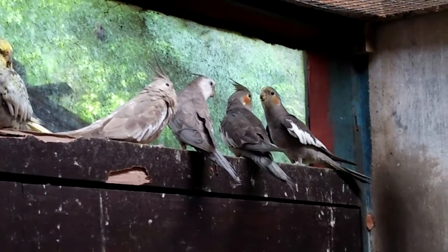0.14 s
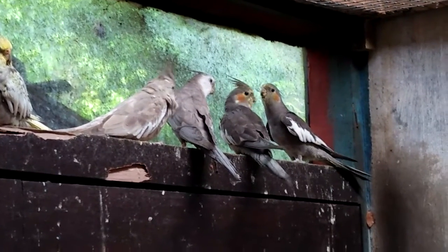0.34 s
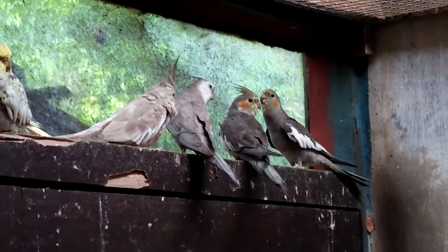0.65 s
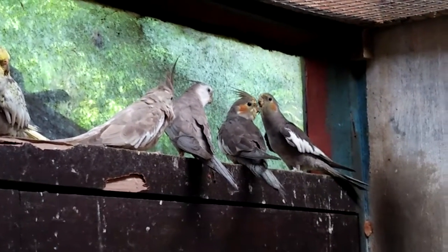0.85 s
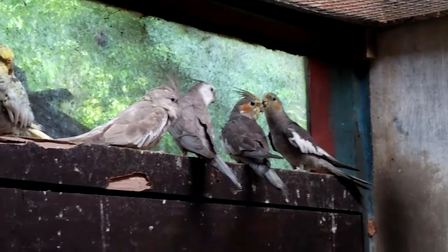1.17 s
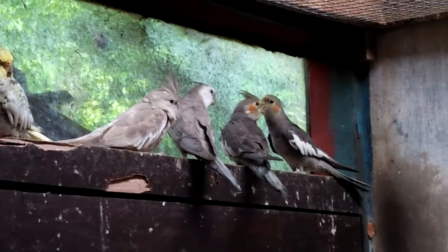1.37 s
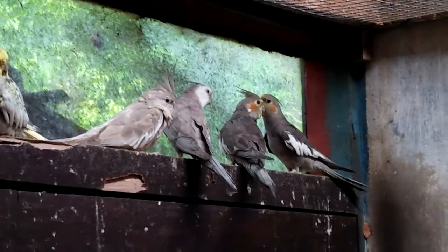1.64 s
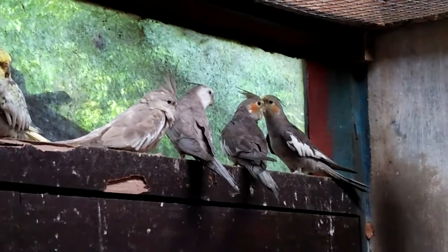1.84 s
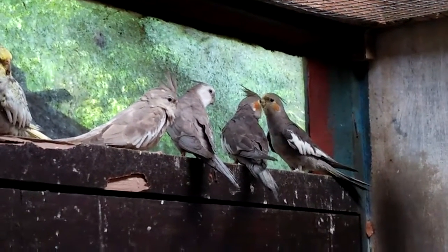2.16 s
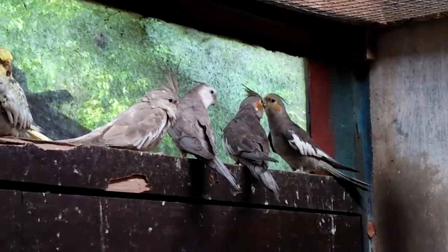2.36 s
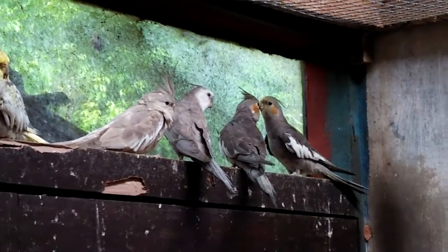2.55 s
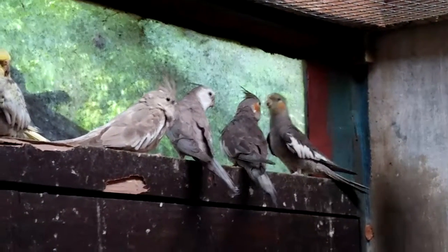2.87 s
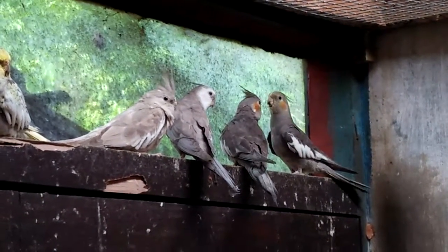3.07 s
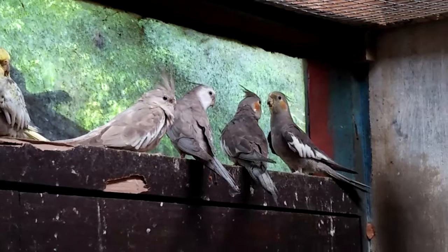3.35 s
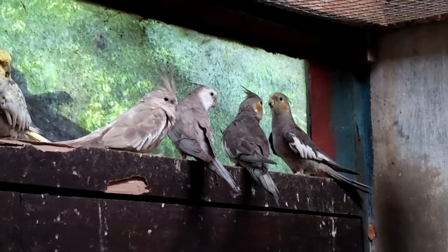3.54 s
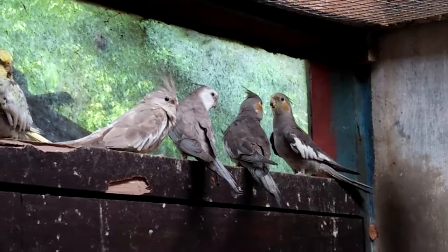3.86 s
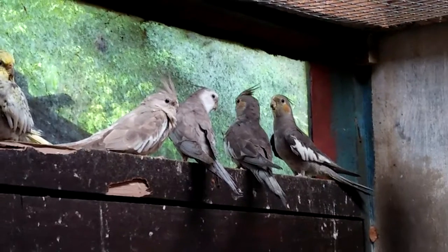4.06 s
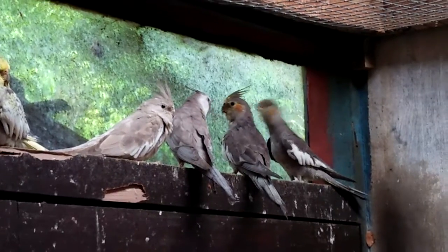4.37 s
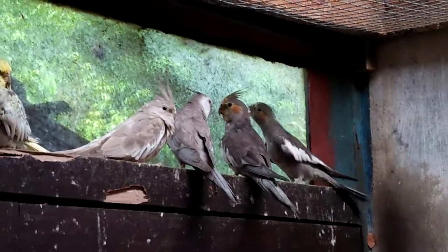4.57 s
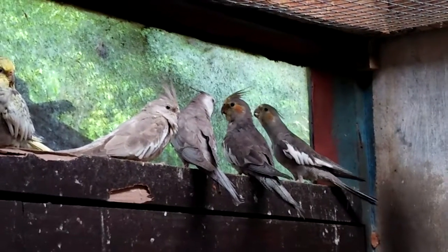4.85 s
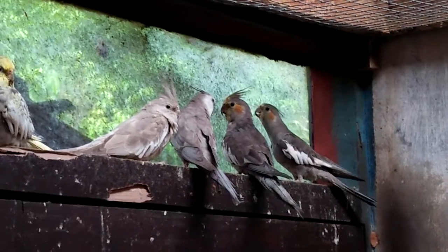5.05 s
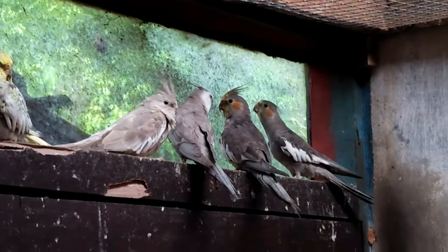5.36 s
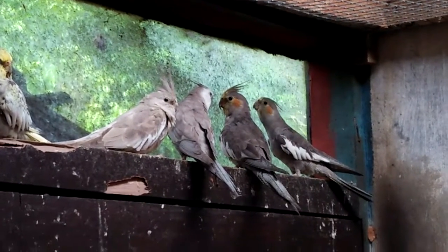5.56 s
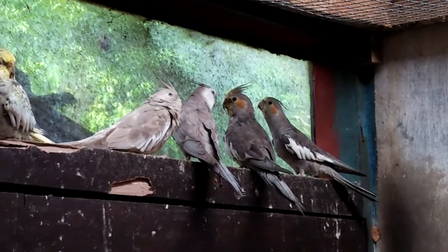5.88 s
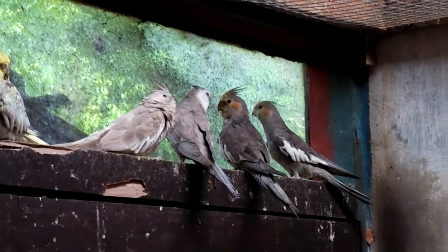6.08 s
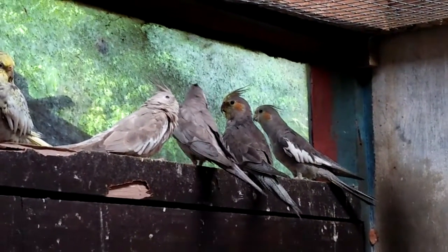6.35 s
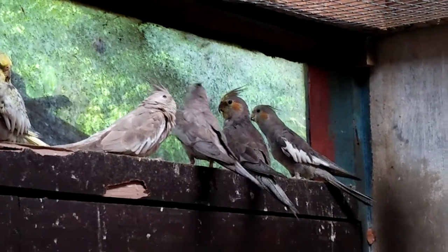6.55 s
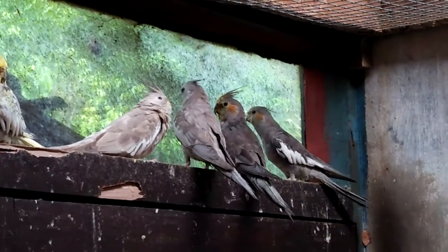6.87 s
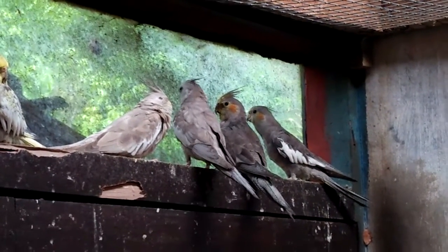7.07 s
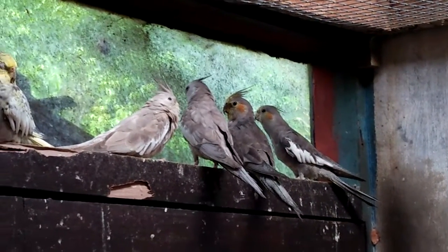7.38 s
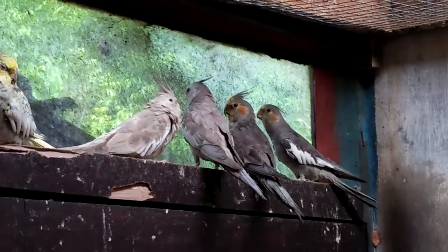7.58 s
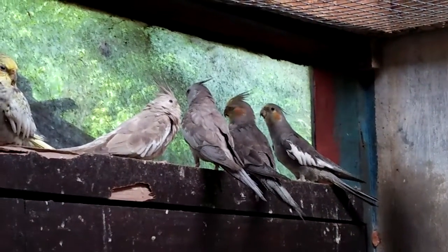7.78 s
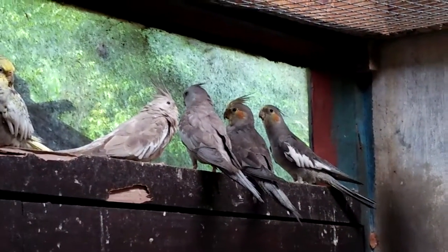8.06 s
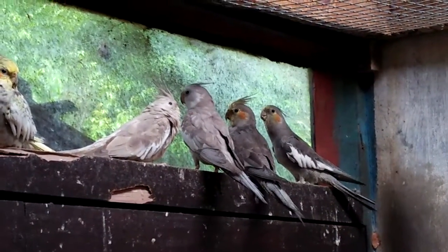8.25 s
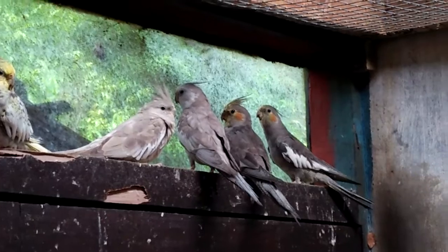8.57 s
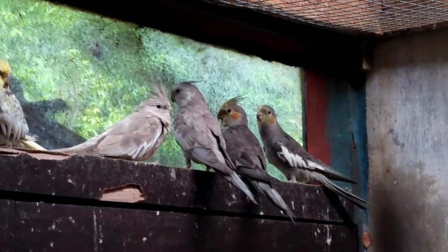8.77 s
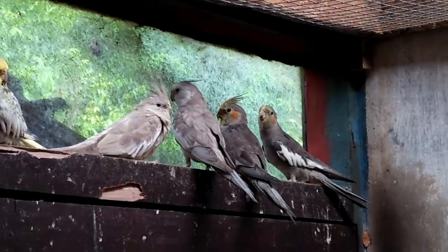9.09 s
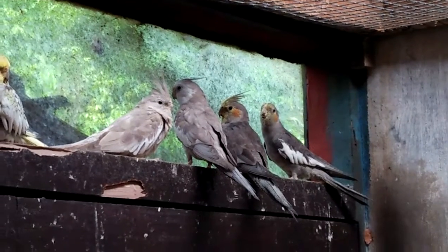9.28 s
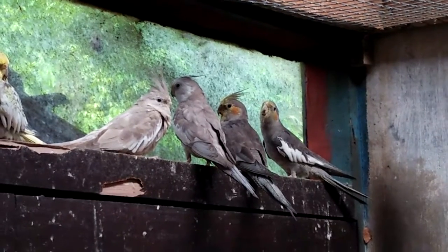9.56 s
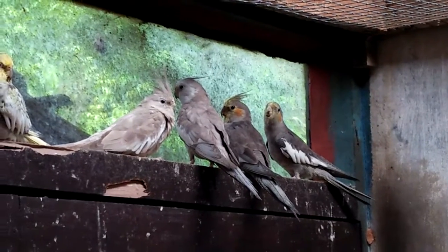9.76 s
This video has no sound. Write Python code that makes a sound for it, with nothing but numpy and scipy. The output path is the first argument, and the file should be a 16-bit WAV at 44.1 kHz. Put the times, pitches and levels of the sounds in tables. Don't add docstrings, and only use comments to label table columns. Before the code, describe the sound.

Several cockatiels call close to the microphone in a small wooden aviary. Quick chirps and a tumbling whistle open, then rasps, harsh squawks and slow falling whistles. A busy burst of sharp peeps and honks follows mid-way. Later one near bird repeats a loud dip-and-rise whistle that cracks, over soft thumps on planks. A yard fowl yelps faintly three times; distant traffic rumbles.

```python
import sys
import numpy as np
from scipy import signal
from scipy.fft import rfft, irfft
from scipy.io import wavfile
from scipy.ndimage import uniform_filter1d

SR = 44100
rng = np.random.default_rng(int(sys.argv[2]) if len(sys.argv) > 2 else 0)


def invert_db(x):
    u = np.asarray(x, float) / 20
    return 10 ** u


def materialize(psi):
    bounded = np.clip(np.atleast_2d(psi).T, -1, 1)
    quanta = np.round(bounded * 32767).astype(np.int16)
    wavfile.write(sys.argv[1], SR, quanta)


N = 437472


def unit(x):
    return x / np.sqrt(np.mean(x ** 2))


def band(x, lo_hz, hi_hz):
    return signal.sosfilt(signal.butter(2, [lo_hz, hi_hz], "band", fs=SR, output="sos"), x)


def colour(x, spectrum):
    hz, db = np.transpose(spectrum)
    bins = np.fft.rfftfreq(len(x), 1 / SR) + 1
    gain = invert_db(np.interp(np.log(bins), np.log(hz), db))
    return irfft(rfft(x) * gain, len(x))


def wobble(n, rate_hz):
    k = max(int(SR / rate_hz), 2)
    smooth = uniform_filter1d(uniform_filter1d(rng.standard_normal(n), k), k)
    return smooth * np.sqrt(1.5 * k)


def follow(rows, fade_s=.007):
    s, *columns = np.transpose(rows)
    start = int(s[0] * SR)
    t = np.arange(start, int(s[-1] * SR)) / SR
    fade = np.clip(np.minimum(t - s[0], s[-1] - t) / fade_s, 0, 1) ** 2
    return start, fade, [np.interp(t, s, c) for c in columns]


def add(track, start, x):
    x = x[:len(track) - start]
    track[start:start + len(x)] += x


def swell(s, length, db, peak_at, start_db, end_db):
    share = np.linspace(0, 1, num=15)
    shape_db = np.interp(share, [0, np.clip(peak_at, .02, .98), 1], [start_db, 0, end_db])
    return np.c_[s + length * share, db + shape_db]


def notes(table, peak_at, start_db, end_db, hold_before, hold_after, arch=0):
    share = np.linspace(0, 1, num=15)
    done, left = share ** hold_before, (1 - share) ** hold_after
    glide = done / (done + left)
    lift = 1 + arch * np.sin(np.pi * share)
    calls = []
    for s, length, from_hz, to_hz, db in table:
        pitch = lift * from_hz * (to_hz / from_hz) ** glide
        levels = swell(s, length, db, peak_at, start_db, end_db)
        calls.append(np.insert(levels, 1, pitch, axis=1))
    return calls


def partials(hz, levels_db):
    turn = 2 * np.pi * np.cumsum(hz) / SR
    total = 0
    for number, db in enumerate(levels_db, start=1):
        total = total + invert_db(db) * (number * hz < .4 * SR) * np.sin(number * turn)
    return total * np.sqrt(2)


# (frequency [Hz], level [dB per Hz])
YARD = [(15, -66), (25, -19), (60, -13.5), (135, -1.5), (210, -12), (370, -29.5), (460, -29.5), (2500, -24),
        (4000, -46.5), (14000, -38.5)]
# (time [s], level [dB])
RUMBLE = [(0, -70), (.9, -72.5), (1.3, -76.5), (1.7, -73.5), (2.1, -67), (2.6, -73), (2.95, -78.5),
          (3.7, -68), (4.2, -75), (4.85, -66), (5.15, -75), (5.6, -65), (6.05, -71), (6.8, -73), (7.7, -70),
          (8.65, -74), (9.2, -73.5), (9.92, -74)]
# (time [s], level [dB])
FAR_PENS = [(0, -60.5), (.55, -74), (.85, -67.5), (2.052, -66.5), (2.298, -70), (4.398, -64.5), (5.1, -71),
            (5.8, -62.5), (6.1, -78.5), (7.5, -64), (8.65, -69), (9.92, -65.5)]


def yard():
    t = np.arange(N) / SR
    rumble_top_hz = 260
    air = invert_db(-67.5) * unit(colour(rng.standard_normal(N), YARD))
    murmur = invert_db(5 * wobble(N, 8)) * unit(band(rng.standard_normal(N), 420, 1800))
    high_pass = signal.butter(4, rumble_top_hz, "high", fs=SR, output="sos")
    hiss = signal.sosfilt(high_pass, air) * invert_db(2.5 * wobble(N, 4))
    rumble_db = np.interp(t, *np.transpose(RUMBLE)) + 1.5 * wobble(N, 8)
    rumble = invert_db(rumble_db) * unit(band(air, 12, rumble_top_hz))
    return hiss + rumble + invert_db(np.interp(t, *np.transpose(FAR_PENS))) * murmur


def shelter(x, direct_db):
    t60_s, treble_t60_s, tail_db, echo_db = 0.32, 0.22, -1.5, -13
    t = np.arange(int(.7 * SR)) / SR
    noise = rng.standard_normal(len(t))
    low = signal.sosfilt(signal.butter(1, 4000, fs=SR, output="sos"), noise)
    tail = low * 1000 ** (-t / t60_s) + (noise - low) * 1000 ** (-t / treble_t60_s)
    tail = tail * (1 - np.exp(-t / 0.022))
    response = invert_db(tail_db) * tail / np.sqrt(np.sum(tail ** 2))
    response[rng.integers(100, 1000, size=16)] += invert_db(echo_db) * rng.standard_normal(16)
    response[0] = invert_db(direct_db)
    return signal.fftconvolve(x, response)[:N] / np.sqrt(np.sum(response ** 2))


# (time from its start [s], pitch [Hz], level [dB])
YELP = [(0, 631.7, 6), (.03, 533, 5), (.06, 453.5, 5), (.12, 389.7, 0.5), (.2, 340, -5), (.34, 270, -11)]
YELP_PARTIALS_DB = [-6, -1, 0, -3, -9, -19]
# (time [s], level [dB])
YELPS = [
    (2.228, -55),
    (5.315, -50.5),
    (8.165, -53),
]


def fowl():
    out = np.zeros(N)
    for s, db in YELPS:
        _, fade, (hz, shape_db) = follow(YELP, fade_s=.012)
        hz = hz * (1 + .045 * wobble(len(hz), 200))
        shape_db = shape_db + 3.5 * wobble(len(hz), 40)
        add(out, int(s * SR), fade * invert_db(db + shape_db) * partials(hz, YELP_PARTIALS_DB))
    return out


# (time [s], peak level [dB], share of the deepest ring [dB])
THUMPS = [(6.312, -48, 0.5), (6.639, -40, -3.5), (6.777, -41, -17), (7.049, -63, 14), (7.21, -48, 10),
          (7.464, -41, 1.5), (7.767, -37.5, 0), (8.524, -51, 6), (8.911, -38.5, 6.5), (8.999, -38, 0.5),
          (9.248, -43, 7), (9.479, -50.5, -3), (9.642, -40.5, 3), (9.684, -37.5, 5.5)]
# (frequency [Hz], level [dB], time to fade by 60 dB [s])
PLANKS = [(180.7, -9, 0.14), (291.3, -10, 0.23), (461, 0.5, 0.13), (600, -3, 0.071), (813, -14.5, 0.13),
          (1000, -37.5, 0.076)]


def thumps():
    out, t = np.zeros(N), np.arange(SR // 3) / SR
    detune = .06
    for s, db, deep_db in THUMPS:
        chance = rng.standard_normal((len(PLANKS), 2))
        ring = 0
        for k, ((hz, mode_db, t60_s), (level_luck, pitch_luck)) in enumerate(zip(PLANKS, chance)):
            gain = invert_db(mode_db + 3.0 * level_luck + (deep_db if k == 0 else 0))
            tone = np.sin(2 * np.pi * hz * (1 + detune * pitch_luck) * t)
            ring = ring + gain * tone * 1000 ** (-t / t60_s)
        boom = unit(band(rng.standard_normal(len(t)), 152, 224)) * 1000 ** (-t / 0.18)
        scrape = unit(band(rng.standard_normal(len(t)), 150, 2000)) * 1000 ** (-t / 0.24)
        blow = ring + invert_db(-2.0) * scrape + invert_db(-6.5 + deep_db) * boom
        add(out, int(s * SR), invert_db(db - 2.5) * blow * (1 - np.exp(-t / 0.0025)))
    return band(out, 125, 6000)


# (time [s], length [s], peak level [dB])
RUSTLE = [
    (3.371, 0.97, -62),
    (6.282, 0.06, -56.5),
    (7.939, 0.18, -64.5),
]


def rustle():
    out = np.zeros(N)
    for rows in RUSTLE:
        start, fade, (db,) = follow(swell(*rows, peak_at=0.4, start_db=-5.5, end_db=-12.5))
        grains = invert_db(2.4 * wobble(len(db), 200)) * rng.standard_normal(len(db))
        add(out, start, fade * invert_db(db) * unit(band(grains, 3100, 9700)))
    return out


def whistles(calls, rough, second_db, third_db, tense_db=11, throb=0):
    out = np.zeros(N)
    clear = np.clip(1.5 - 2.4 * rough, 0, 1)
    for rows in calls:
        start, fade, (hz, db) = follow(rows, fade_s=.008 + .012 * rough)
        hz, n = uniform_filter1d(hz, 200), len(hz)
        falling = np.clip(-np.gradient(np.log2(hz)) * SR, 0, 30)
        shake = np.clip(rough, 0, .75)
        shake = shake + .016 * falling * np.clip(1 - 1.4 * shake, 0, 1)
        hz = hz * (1 + 0.00993 * wobble(n, 120) + 0.16 * shake ** 2 * wobble(n, 866))
        windpipe_db = 23 * clear * np.exp(-(np.log2(2 * hz / 3750) / 0.29) ** 2)
        effort_db = .65 * (db - np.max(db))
        edge_db = third_db + effort_db + tense_db * np.log2(hz / np.mean(hz)) + 4 * wobble(n, 25)
        levels_db = [0, second_db + effort_db + windpipe_db - np.mean(windpipe_db)]
        levels_db += [edge_db + (-1.5 - 7 * shake) * k for k in range(6)]
        flutter = invert_db(1.96 * wobble(n, 41) + 7.0 * shake * wobble(n, 300))
        throb_hz = 76 * (1 + .25 * wobble(n, 30))
        beat = np.cos(2 * np.pi * np.cumsum(throb_hz) / SR)
        flutter = flutter * (1 + throb * invert_db(effort_db) * beat)
        air = invert_db(-55 + effort_db + 32 * shake) * band(rng.standard_normal(n), 1500, 14000)
        add(out, start, fade * invert_db(db) * flutter * (partials(hz, levels_db) + air))
    return out


# (time from its start [s], pitch [Hz], level [dB])
THIN = [(0, 5150, -23), (.055, 3952, -11), (.23, 3835, -6.5), (.28, 3404, -5), (0.301, 2260, -4)]
# (time [s], pitch ratio, level [dB])
THINS = [
    (.03, 1.04, -45.5),
    (6.05, .985, -43),
]


def thin_whistles():
    calls = [np.array(THIN) * (1, ratio, 1) + (s, 0, db) for s, ratio, db in THINS]
    return whistles(calls, rough=.1, second_db=-18, third_db=-41)


# (time [s], length [s], from [Hz], to [Hz], peak level [dB])
SIGHS = [(.71, .13, 2498, 2574, -31), (.25, 0.13, 2670, 2100, -41.5), (.29, 0.086, 1930, 1400, -38),
         (.71, 0.098, 1880, 1492, -40), (1.75, .17, 2008, 1570, -41), (1.86, 0.055, 2630, 2400, -52.5),
         (2.27, 0.16, 3900, 3240, -57), (2.27, .13, 2950, 2470, -42.5), (2.78, 0.089, 2072, 1522, -38.5),
         (2.84, 0.14, 2640, 2156, -44.5), (3.82, 0.058, 2560, 2100, -38.5), (3.96, 0.11, 3940, 2950, -55.5),
         (4.6, 0.15, 2114, 1910, -44), (6.12, .18, 1848, 1471, -39.5), (7.97, 0.15, 1878, 1494, -36),
         (8.69, 0.062, 1894, 1850, -54.5), (9.16, 0.17, 2006, 1547, -41), (9.69, .21, 1865, 1507, -41.5),
         (9.89, 0.053, 2200, 2390, -41)]


def sighs():
    calls = notes(SIGHS, peak_at=0.74, start_db=-12.5, end_db=-4, hold_before=1.96, hold_after=1.4)
    return whistles(calls, rough=.27, second_db=-38.5, third_db=-41.5)


# (time [s], length [s], from [Hz], to [Hz], peak level [dB])
CHEEPS = [(4.312, 0.034, 2760, 2050, -34), (.2, 0.074, 769, 737, -58.5), (.8, .06, 820, 697, -53.5),
          (.96, .04, 950, 874, -52.5), (8.02, 0.049, 1156, 1000, -47.5), (0, 0.029, 2326, 1562, -32),
          (.03, 0.079, 1792, 1716, -29.5), (2.17, 0.056, 1717, 1465, -38.5), (2.47, 0.083, 1837, 1510, -40),
          (2.92, 0.075, 1690, 1790, -31.5), (3.27, .15, 1917, 1795, -42), (3.85, 0.044, 1550, 1760, -32.5),
          (4.297, 0.023, 2960, 2960, -37), (4.97, 0.065, 1645, 1494, -37.5), (5.47, 0.068, 2030, 1794, -42),
          (5.74, 0.042, 1570, 1446, -43), (5.92, 0.024, 1230, 1058, -46), (5.93, 0.095, 2556, 2290, -61),
          (6.04, 0.068, 2030, 2060, -72), (7.1, 0.12, 1786, 1546, -37.5), (7.61, 0.067, 1232, 1149, -35),
          (8.58, 0.14, 2260, 2260, -64), (8.7, 0.049, 3760, 3750, -71), (9.68, .06, 2650, 2550, -57),
          (9.85, 0.057, 3650, 3350, -57), (4.335, 0.068, 2660, 2350, -44), (9.3, 0.058, 1315, 1250, -43),
          (9.49, 0.019, 1232, 1150, -40), (9.52, 0.1, 3790, 3520, -57.5)]


def cheeps():
    calls = notes(CHEEPS, peak_at=0.16, start_db=2, end_db=-13.5, hold_before=1.16, hold_after=1)
    return whistles(calls, rough=.37, second_db=-39, third_db=-40)


# (time [s], length [s], from [Hz], to [Hz], peak level [dB])
CROAKS = [(6.452, .06, 1200, 905, -52.5), (9.17, 0.068, 1900, 1650, -47.5), (8.755, 0.101, 1570, 1540, -43),
          (4.15, 0.04, 1705, 1430, -44.5), (4.57, 0.17, 1554, 1490, -52.5),
          (5.37, 0.051, 1680, 1370, -40.5), (8.04, 0.049, 910, 945, -45.5),
          (9.025, 0.069, 1350, 1215, -48.5), (2.585, .061, 2400, 2100, -49.5),
          (8.74, .031, 1100, 1490, -56)]


def rough_glides(table):
    return notes(table, peak_at=3.65, start_db=-3, end_db=-16, hold_before=1, hold_after=1.7)


def croaks():
    return whistles(rough_glides(CROAKS), rough=.62, second_db=-5.5, third_db=-21.5)


# (time [s], length [s], from [Hz], to [Hz], peak level [dB])
HONKS = [
    (4.085, 0.062, 1205, 1200, -49),
    (4.13, 0.074, 2060, 2020, -42),
    (4.328, 0.15, 2038, 1982, -41.5),
    (5.23, 0.04, 2050, 2180, -30.5),
]


def honks():
    calls = notes(HONKS, peak_at=0.7, start_db=4, end_db=-22, hold_before=0.04, hold_after=1.2)
    return whistles(calls, rough=.4, second_db=-8.5, third_db=-30)


# (time [s], length [s], from [Hz], to [Hz], peak level [dB])
MUTTERS = [
    (9.125, 0.11, 1150, 1602, -41),
    (9.27, .11, 1400, 1288, -43),
    (9.48, 0.05, 1217, 1210, -54.5),
    (9.59, 0.069, 1185, 1400, -42.5),
]


def mutters():
    calls = notes(MUTTERS, peak_at=.5, start_db=-6.5, end_db=-19, hold_before=1.16, hold_after=1.23, arch=.12)
    return whistles(calls, rough=.68, second_db=-6, third_db=-20)


# (time [s], length [s], from [Hz], to [Hz], peak level [dB])
STROKES = [
    (4.932, 0.029, 2820, 1950, -42.5),
    (5.078, 0.03, 3250, 1548, -31.5),
    (5.256, 0.0302, 2187, 1460, -29),
]


def strokes():
    return whistles(rough_glides(STROKES), rough=.7, second_db=-3.5, third_db=-21.5)


# (time [s], length [s], from [Hz], to [Hz], peak level [dB])
BLEATS = [
    (4.432, 0.039, 1645, 1650, -36),
    (4.463, .046, 1560, 1510, -38.5),
    (5.345, .076, 1910, 1690, -38.5),
    (4.31, .19, 420, 432, -62.5),
]


def bleats():
    calls = notes(BLEATS, peak_at=0, start_db=-3.5, end_db=-7.5, hold_before=1.2, hold_after=1.7)
    return whistles(calls, rough=.4, second_db=0, third_db=-23)


# (time [s], length [s], from [Hz], to [Hz], peak level [dB])
PEEPS = [
    (1.335, .055, 3960, 3980, -39.5),
    (.562, 0.0993, 3060, 3410, -30),
    (5.036, 0.048, 3400, 3310, -21.5),
]


def peeps():
    calls = notes(PEEPS, peak_at=1.2, start_db=-11, end_db=-4.5, hold_before=0.97, hold_after=1.27)
    return whistles(calls, rough=.24, second_db=-24.5, third_db=-35.5, throb=.5)


# (time [s], pitch [Hz], level [dB])
RASPS = [
    [(1.036, 1500, -34), (1.062, 1527, -31.5), (1.085, 1830, -34.5), (1.11, 1730, -36), (1.14, 1560, -36)],
    [(1.148, 1498, -38), (1.17, 1552, -32.5), (1.21, 1796, -34), (1.245, 1695, -37.5), (1.28, 1573, -45.5)],
    [(4.735, 1497, -42), (4.77, 1520, -39), (4.805, 1765, -33.5), (4.83, 1622, -35), (4.875, 1217, -44.5)],
]


def rasps():
    return whistles(RASPS, rough=.62, second_db=-6.5, third_db=-21)


# (time [s], pitch [Hz], level [dB])
SCREECH = [
    [(8.755, 1890, -52.5), (8.79, 2810, -44), (8.825, 3040, -44), (8.865, 3030, -43), (8.9, 2850, -49)],
    [(8.78, 2250, -50), (8.84, 2500, -42), (8.89, 2480, -36), (8.915, 2280, -32.5), (8.94, 1954, -35.5),
     (8.97, 1550, -40)],
]


def screech():
    return whistles(SCREECH, rough=.57, second_db=-8, third_db=-27.5, tense_db=1)


# (time [s], pitch [Hz], level [dB])
WARBLE = [(.645, 3500, -37.5), (.67, 3910, -43), (.76, 3637, -39.5), (.79, 3150, -34.5), (.82, 2760, -32),
          (.86, 2105, -26), (.88, 1574, -41.5), (.91, 1545, -23.5)]


def warble():
    return whistles([WARBLE], rough=.4, second_db=-25.5, third_db=-22.5, tense_db=19)


# (time [s], pitch [Hz], level [dB])
SLIDES = [
    [(4.0, 2724, -70), (4.06, 2645, -41.5), (4.1, 2252, -36.5), (4.16, 2058, -36), (4.215, 2025, -40)],
    [(2.12, 2667, -64.5), (2.28, 2600, -31.5), (2.35, 2372, -32.5), (2.45, 2182, -30), (2.5, 2112, -25.5),
     (2.62, 2004, -29.5)],
    [(3.37, 2516, -54.5), (3.48, 2396, -36.5), (3.56, 2310, -29.5), (3.6, 1938, -27.5), (3.68, 2123, -32)],
]


def slides():
    return whistles(SLIDES, rough=.27, second_db=-36, third_db=-44, tense_db=-23.5, throb=.5)


# (time [s], pitch [Hz], level [dB])
PLUNGE = [(5.52, 3244, -42), (5.545, 3790, -34.5), (5.575, 3730, -31.5), (5.6, 2883, -24.5),
          (5.62, 2703, -22.5), (5.632, 1587, -33), (5.67, 1070, -42)]


def plunge():
    return whistles([PLUNGE], rough=.2, second_db=-29, third_db=-34.5, tense_db=4, throb=.3)


# (time [s], length [s], peak level [dB], share of the length at the peak)
SQUAWKS = [
    (1.368, 0.39, -33, 0.19),
    (2.58, 0.12, -43, 0.17),
    (3.052, 0.22, -37.5, .35),
    (3.47, 0.49, -45.5, 0.22),
]
# (frequency [Hz], level [dB])
WIDE_BEAK = [(180, -83), (300, -48), (619, -29), (925, -16.5), (1160, -9), (1430, -22), (2390, -12),
             (3090, -21.5), (3460, -19), (10300, -52), (14000, -57)]
# (frequency [Hz], level [dB])
NARROW_BEAK = [(180, -69), (300, -31.5), (463, -19.5), (660, -25), (881, -6.5), (1100, -12.5), (1650, -8.5),
               (2630, -18), (5600, -41), (14000, -65)]


def squawks():
    out = np.zeros(N)
    pitch_hz, split_hz, gust_db = 573.8, 1800, 2
    for k, (*rows, peak_at) in enumerate(SQUAWKS):
        beak, air_share = (NARROW_BEAK, 1.3) if k else (WIDE_BEAK, .6)
        start, fade, (db,) = follow(swell(*rows, peak_at, start_db=-16.5, end_db=-18.5), fade_s=0.025)
        n = len(db)
        phase = np.cumsum(pitch_hz * (1 + 0.08 * wobble(n, 250))) / SR
        pulses = np.diff(np.floor(phase), prepend=0) * invert_db(4.3 * wobble(n, 600))
        air = np.exp(-(phase % 1) / 0.14) * rng.standard_normal(n)
        voice = colour(unit(pulses) + air_share * unit(air), beak)
        voice = voice / np.std(band(voice, 480, 1070))
        low = colour(voice, [(split_hz / 1.2, 0), (split_hz * 1.2, -40)])
        high_db = 6 + 0.63 * (db - np.max(db)) + gust_db * wobble(n, 70)
        low_gust = invert_db(gust_db * wobble(n, 40))
        add(out, start, fade * invert_db(db) * (low_gust * low + invert_db(high_db) * (voice - low)))
    return out


# (time [s], pitch [Hz], level [dB])
CONTACTS = [
    [(6.404, 2300, -27), (6.44, 2253, -24.5), (6.47, 1850, -29), (6.505, 1538, -29), (6.533, 2150, -29.5),
     (6.565, 2723, -20.5), (6.6, 2982, -22), (6.645, 3061, -21), (6.66, 2970, -37.5)],
    [(6.913, 2387, -34), (6.945, 2334, -29), (6.972, 1930, -25.5), (7.01, 1400, -34), (7.045, 2010, -34.5),
     (7.078, 2800, -21), (7.115, 3125, -25), (7.16, 2950, -24), (7.19, 2450, -26)],
    [(7.424, 2102, -30), (7.475, 2074, -25.5), (7.5, 1797, -27.5), (7.53, 1524, -29), (7.555, 2146, -29.5),
     (7.587, 2667, -22), (7.637, 2886, -17.5), (7.678, 2980, -23), (7.7, 3050, -38.5)],
    [(8.155, 2338, -34.5), (8.2, 2301, -25.5), (8.235, 1960, -28.5), (8.265, 1549, -33.5),
     (8.292, 2193, -34), (8.33, 2830, -21), (8.36, 3000, -25.5), (8.385, 3140, -31), (8.405, 3030, -47)],
]
# (time [s], from [Hz], effort [dB])
CRACKS = [
    (6.64, 2960, -16.5),
    (7.17, 2456, -22),
    (7.668, 3000, -19.5),
    (8.388, 2413, -19),
]


def contact_calls():
    crack_s, crack_to_hz, crack_db = .035, 1400, -13
    cracks = [[(s, hz, db + crack_db), (s + crack_s, crack_to_hz, db + crack_db)] for s, hz, db in CRACKS]
    calls = whistles(CONTACTS, rough=.2, second_db=-22, third_db=-37.5, tense_db=6, throb=.55)
    return calls + whistles(cracks, rough=.7, second_db=-22.5, third_db=-45.5)


def scene():
    far = thumps() + thin_whistles() + sighs() + cheeps() + croaks() + honks() + mutters()
    near = rustle() + strokes() + bleats() + peeps() + rasps() + screech()
    near = near + warble() + slides() + plunge() + squawks() + contact_calls()
    paths = [(near, 1.5), (far, -5.5), (fowl(), -15)]  # (sound, direct level [dB])
    return (sum(shelter(x, direct_db) for x, direct_db in paths) + yard())[None]


def top_cut(x):
    return signal.sosfilt(signal.butter(12, 14790, fs=SR, output="sos"), x)


def record(dry):
    dry = dry + invert_db(-7.0) * band(dry, 10400, 12000) + invert_db(-2.5) * band(dry, 12800, 15000)
    notch_hz = 368
    notch = signal.butter(1, [notch_hz * .9, notch_hz * 1.1], "band", fs=SR, output="sos")
    dry = dry - invert_db(-2) * signal.sosfiltfilt(notch, dry)
    top = signal.ellip(10, .3, 70, 14300, fs=SR, output="sos")
    mix = signal.sosfilt(top, dry)
    return top_cut(mix)


dry = scene()
out = record(dry)
materialize(out)
```